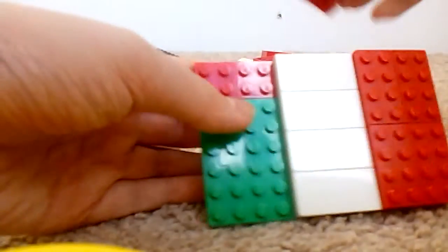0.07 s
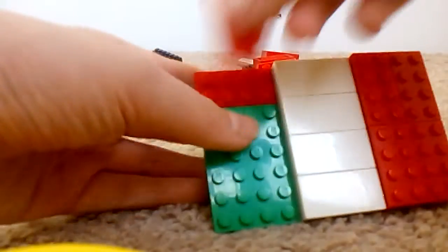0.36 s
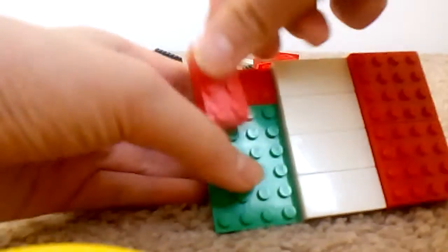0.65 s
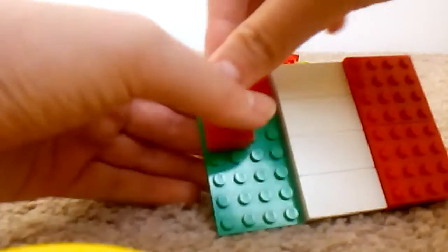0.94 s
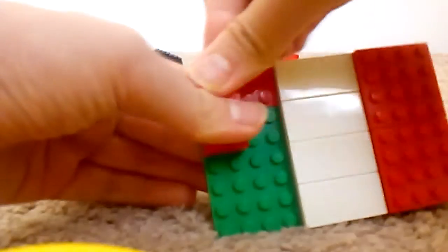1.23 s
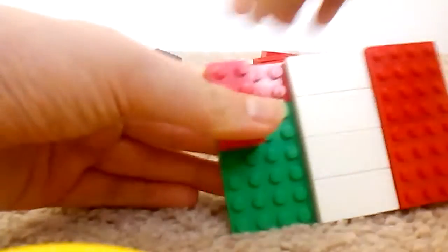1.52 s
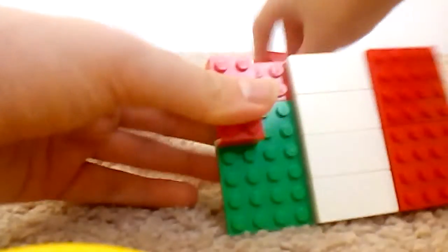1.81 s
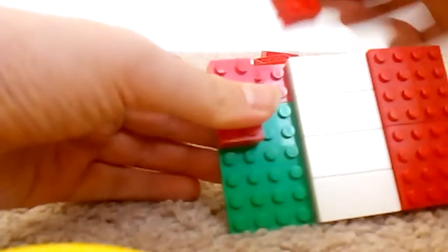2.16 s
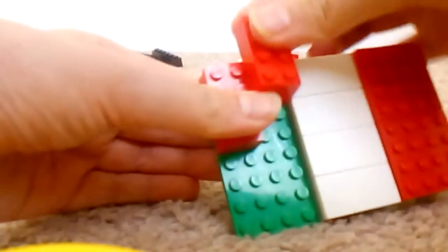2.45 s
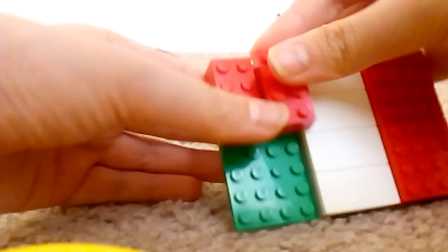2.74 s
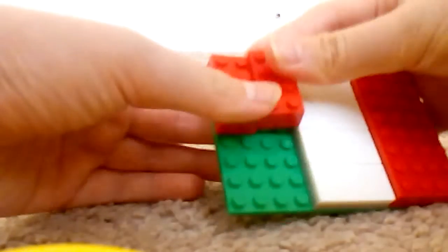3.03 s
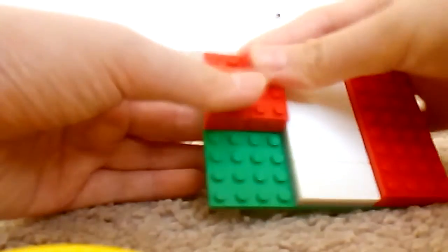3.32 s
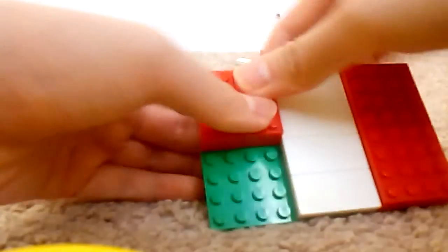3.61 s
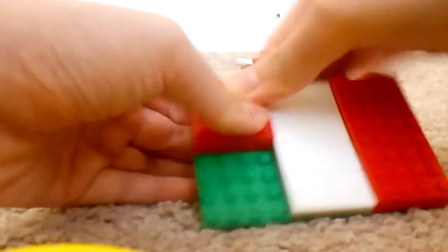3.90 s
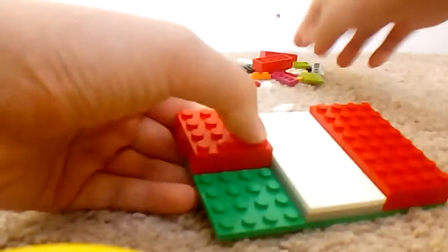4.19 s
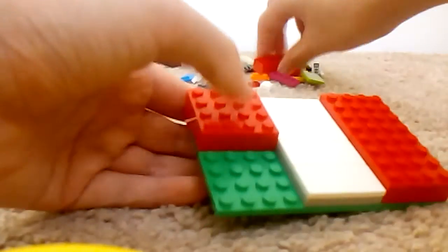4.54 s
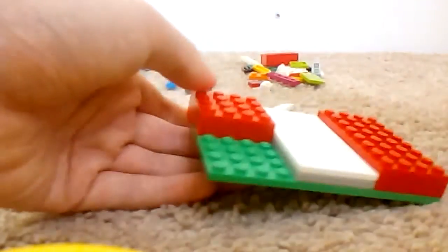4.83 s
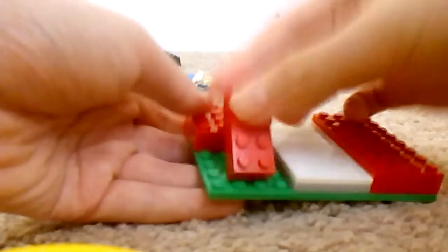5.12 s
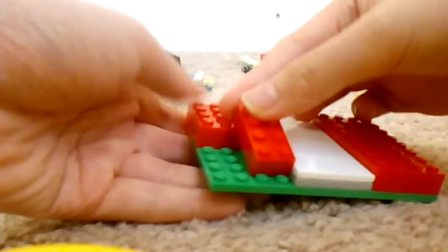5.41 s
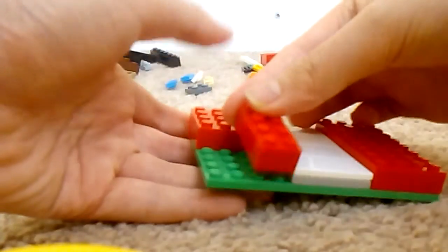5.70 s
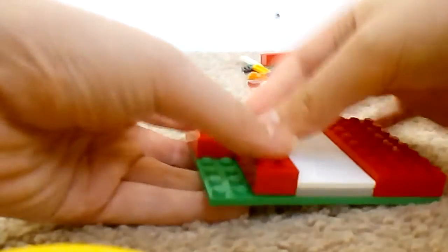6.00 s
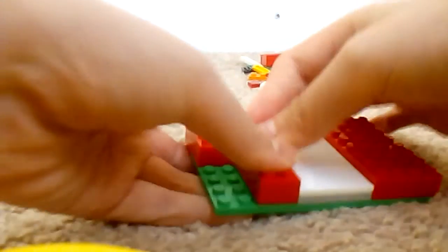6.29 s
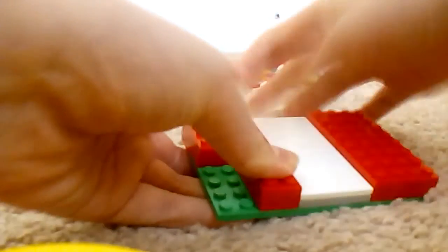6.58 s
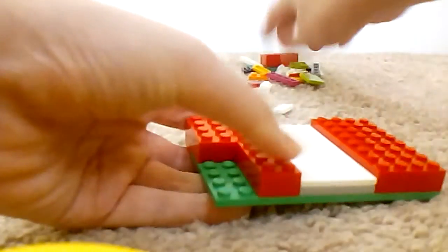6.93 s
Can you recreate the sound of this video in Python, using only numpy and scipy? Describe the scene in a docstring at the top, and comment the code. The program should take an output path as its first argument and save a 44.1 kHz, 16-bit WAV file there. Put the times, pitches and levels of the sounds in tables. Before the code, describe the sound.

A low room rumble and soft hiss run throughout. At about 0.7 seconds a plastic toy brick clicks lightly onto a plate close to the microphone, followed by a quick run of ticks against the studs and a firmer snap at 1.2 seconds. Around 1.9 seconds loose bricks clink briefly in a pile further back. A few small clicks come between 2.6 and 2.8 seconds, then a sharp, bright snap at 3.4 seconds. From 4.6 to 5 seconds a hand picks through the pile again with light, high clinks. Another brick snaps on at 5.4 seconds, with small ticks after it and again near 6.1 seconds. The loudest snap lands at about 6.3 seconds, and a couple of faint ticks follow near the end. Fingers rub faintly on the plastic now and then. The clicks are short and crisp, with a slight small-room echo.

```python
"""A low room rumble and soft hiss come first, then plastic toy bricks click onto a hand-held plate.
Studs tick against brick edges as a brick is lined up; it then slips over them and snaps home.
Each contact makes the plastic ring briefly. Further back, a hand picks loose bricks from a pile.
Fingers rub faintly, thin tones come and go, and the small room adds a few echoes and a short tail."""
import sys
import numpy as np
from scipy import signal
from scipy.fft import rfft, irfft
from scipy.io import wavfile
from scipy.ndimage import uniform_filter1d

SR = 44100
rng = np.random.default_rng(int(sys.argv[2]) if len(sys.argv) > 2 else 0)


def inscribe(sig):
    """Save sig as 16-bit PCM at rate SR to the path in sys.argv[1].

    A 1-D sig is mono; a 2-D sig holds one channel per row.
    Samples are clipped to [-1, 1] before scaling.
    """
    pcm = np.round(np.clip(np.atleast_2d(sig).T, -1, 1) * 32767)
    wavfile.write(sys.argv[1], SR, pcm.astype(np.int16))


N = 306495

# Tone colour of the room and microphone noise: f/Hz, relative level/dB
NOISE_COLOUR = [(20, -24.5), (38, -18), (58, -2), (85, 2), (135, -4.5), (200, -10), (320, -9.5), (500, -16),
                (780, -14), (1200, -18.5), (3000, -22.5), (7200, -23), (8400, -34.5), (9200, -60)]
# Faint thin tones: t/s, length/s, f/Hz, width/Hz, level/dB
THIN_TONES = [(0.712, 1, 742, 130, -69), (1.72, 0.31, 185, 200, -64.5), (4.7, 0.4, 215, 10.5, -66.5)]
# Fingers sliding on plastic: t/s, length/s, rub level/dB, hiss level/dB
FINGER_SLIDES = [(0.798, 0.057, -61, -77), (1.603, .053, -63, -70), (1.894, .078, -61.5, -62),
                 (3.892, 0.12, -61, -64), (4.216, 0.21, -66.5, -78), (5.217, 0.19, -65, -73),
                 (5.909, 0.045, -67, -72.5), (6.45, 0.37, -68, -66)]

# Echoes from the nearest walls and furniture: delay/s, relative level/dB
WALL_ECHOES = [(0.0143, -22.5), (.0176, -28), (0.0217, -25.5), (0.0326, -28), (.0365, -32.5),
               (0.0474, -34.5)]
# How long the room rings: f/Hz, t60/s (t60 is the time to fade by 60 dB)
TAIL_FADE = [(200, .25), (1000, .25), (3000, 0.23), (5200, 0.28), (8000, .3)]
# Tone colour of the room's tail: f/Hz, relative level/dB
TAIL_COLOUR = [(200, -6), (1000, -10), (2000, 1), (3300, 5.5), (4150, -7), (5200, 1), (6000, -2),
               (6900, -0.5), (8500, 2)]

# Modes (natural vibrations) of loose bricks, in two groups: f/Hz, relative level/dB, base t60/s
BRICK_LOW = [(3750, -1.5, 0.0089), (4390, -3, 0.032), (4750, -2, 0.0098), (5200, -2, 0.022),
             (5754, 1, 0.063), (5970, -5, 0.055)]
BRICK_HIGH = [(6430, 5, .025), (6400, -16, .025), (6870, -4, 0.042), (6900, 2, 0.035), (7100, 0, 0.036),
              (7300, 0, 0.015), (7550, -7, 0.023), (8100, -13.5, 0.02)]
# Modes of the built-up plate, in five groups from low to high: f/Hz, relative level/dB, base t60/s
PLATE_THUMP = [(159, -2, .035), (280, 0.5, 0.041), (380, -2, 0.011)]
PLATE_KNOCK = [(660, 0.93, 0.028), (760, 0.52, 0.037), (1001, -1, 0.019)]
PLATE_BODY = [(1239, -5, 0.023), (1522, 2.5, .02), (1934, -4, 0.02), (2244, 3, .02), (2613, 1, 0.023),
              (2970, -3, 0.024)]
PLATE_CRACK = [(3230, -9.5, 0.022), (3460, -4.5, .02), (3620, 1.5, .022), (3850, -3, 0.032),
               (4070, 5.5, 0.015), (4450, 4, .018), (4900, -4, 0.019), (4870, -1.5, 0.029),
               (5250, -1, .018), (5730, 2.5, 0.017)]
PLATE_EDGE = [(6200, 2, 0.014), (6680, -1.5, 0.0086), (6550, 2, 0.022), (6890, 3.5, 0.031),
              (7340, 1, 0.028), (7370, -3.5, 0.042), (8020, -7.5, 0.019)]

# Clinks in the pile, brighter when a corner hits: t/s, relative level/dB, brightness/dB, wall f/Hz
PILE_CLINKS = [(0.236, -66.5, -1, 7000), (0.444, -71, 11.5, 6700), (.544, -70, 4, 6700),
               (1.8989, -41, 4, 6150), (1.916, -37.5, 7.5, 6770), (1.95, -45, 4, 6900),
               (4.619, -53.5, 1, 6800), (4.631, -37, 0.5, 6780), (4.645, -44, 7.5, 6710),
               (4.676, -53, 9, 6660), (4.754, -55, -5, 5750), (4.777, -55.5, 0, 5720),
               (4.8, -55.5, 2, 6530), (4.809, -51, 8, 6500), (4.829, -45, 4, 6370),
               (4.943, -39.5, 2.5, 6840), (5.3142, -59.5, 3, 6800)]
# Studs and edges touching the plate: t/s, level/dB, heft/dB, tilt/(dB per octave), wall f/Hz
# Heft is the whole plate's knock compared with the level; tilt is brightness, higher for hard hits.
# "Wall" is the side of the brick that rings.
STUD_TICKS = [(.8449, -58, -8.5, -1, 7100), (.9135, -44, -16, 4.5, 4330), (.934, -34, -19.5, 2.5, 4180),
              (.9722, -61, -18, 1, 4200), (.9969, -44.5, -9, 1, 3940), (1.0278, -48, -8, 0, 5000),
              (1.052, -43.5, -15, -3, 4050), (1.0792, -40, -20, 1.5, 4120), (1.2012, -35, -16, 6, 4100),
              (1.6255, -63, 6, 7, 7360), (2.5973, -57.5, 8.5, 5, 7060), (2.6075, -45.5, -7, -3, 2280),
              (2.7239, -58, -1, 2, 2270), (2.8046, -42, -20, -2, 3520), (3.127, -62.5, -3, -1, 2230),
              (3.6831, -62.5, 2, -1, 2370), (4.2574, -61, -5, -1.5, 5470), (4.28, -63.5, -2, 11, 5430),
              (4.3161, -62, -2, 6, 4280), (5.5477, -48, -12.5, -1, 4460), (5.6577, -52.5, -16, -6, 3500),
              (6.085, -37.5, -22, -0.5, 4040), (6.101, -57, -10, 4, 4020), (6.1114, -53, -2, 2, 4500),
              (6.1185, -55, -3, -6, 2030), (6.1441, -59, -13.5, -0.5, 3730), (6.8187, -69, 16.5, -8, 2330),
              (6.8483, -57.5, -4, 3, 4840)]
# Bricks slipping over the studs, then seating (landing in place):
# t/s, slip level/dB, slip heft/dB, slip wall f/Hz, travel/s,
# seat level/dB, seat heft/dB, seat tilt/(dB per octave), seat wall f/Hz, seat wall level/dB
BRICK_SNAPS = [(0.6963, -44.5, -15, 6820, 0.003, -45.5, 1, -3.5, 7100, -55),
               (1.2309, -29, -30, 4100, .0029, -35.5, 4.5, -2, 3880, -31),
               (2.7339, -39.5, -8, 4150, .002, -43, -3, -7.5, 3960, -46),
               (3.442, -20, -15, 5150, 0.002, -36, -9.5, 13, 3680, -19.5),
               (5.407, -34, -23, 4270, .0105, -30.5, -16.5, 4, 2600, -39),
               (6.2619, -20.5, -23.5, 6606, .003, -18, -19, -2, 3040, -26.5)]


def amp(db):
    """Turns decibels into a gain."""
    return 10 ** (np.asarray(db) / 20)


def unit(x):
    """Scales a signal to an average (rms) size of 1."""
    return x / np.sqrt(np.mean(x ** 2) + 1e-20)


def unit_hit(x):
    """Scales a short sound to the energy of 10 ms at rms 1."""
    return x * np.sqrt(SR / 100 / (np.sum(x ** 2) + 1e-20))


def curve_at(points, hz):
    """Looks up values between a table's frequencies, on a log scale."""
    f, value = np.transpose(points)
    return np.interp(np.log(hz + 1), np.log(f + 1), value)


def add(mix, s, sound):
    """Mixes a sound in at s seconds."""
    part = mix[round(s * SR):][:len(sound)]
    part += sound[:len(part)]


def without_bass(x, edge_hz, order):
    """Turns down everything below edge_hz."""
    return signal.sosfilt(signal.butter(order, edge_hz, "high", fs=SR, output="sos"), x)


def ring(hz, t60, rise_s=.00012):
    """One vibration with a slightly softened start, which then dies away."""
    t = np.arange(4096) / SR
    return np.sin(2 * np.pi * hz * t) * np.exp(-np.log(1000) * t / t60) * (1 - np.exp(-t / rise_s))


def strike(modes, t60_scale=1, spread_db=5.0, detune=0.0056):
    """Rings a group of modes; the spot hit sets each one's sign and share, and the grip detunes it."""
    hz, db, t60 = np.transpose(modes)
    side, share, grip = rng.standard_normal((3, len(hz)))
    rings = ring((hz * (1 + detune * grip))[:, None], t60[:, None] * t60_scale)
    return unit_hit((np.sign(side) * amp(db + spread_db * share)) @ rings)


def swell(length, centre_hz, width_hz, grain_db=3):
    """A band of grainy noise swells and fades: a rub when wide, a thin tone when narrow."""
    hz = np.fft.rfftfreq(SR, 1 / SR)
    hiss, grain = rng.standard_normal((2, SR))
    rough = hiss * amp(grain_db * unit(uniform_filter1d(grain, size=130)))
    band = 1 / (1 + (2 * (hz - centre_hz) / width_hz) ** 4)
    rub = irfft(rfft(rough) * band, SR)[:round(length * SR)]
    return unit(rub * signal.windows.tukey(len(rub), .7))


def background(level_db=-61, waver_db=2.0, rumble_hz=350):
    """Room and microphone noise: a steady hiss over a low rumble that wavers."""
    hz = np.fft.rfftfreq(N, 1 / SR)
    noise = rfft(rng.standard_normal(N)) * amp(curve_at(NOISE_COLOUR, hz))
    low_share = 1 / (1 + (hz / rumble_hz) ** 4)
    waver = unit(irfft(rfft(rng.standard_normal(N)) * np.exp(-hz / 6), N))
    rumble = irfft(noise * low_share, N) * amp(waver_db * waver)
    hiss = irfft(noise * (1 - low_share), N)
    return amp(level_db) * unit(rumble + hiss)


def tones():
    """Faint thin tones come and go in the noise."""
    out = np.zeros(N)
    for s, length, hz, width_hz, db in THIN_TONES:
        add(out, s, amp(db) * swell(length, hz, width_hz))
    return out


def room(x, echo_db, tail_db, onset_s):
    """The room answers with a few clear echoes and a blurred tail; each pitch fades at its own rate."""
    hz, t, bands = signal.stft(rng.standard_normal(SR // 2), SR, nperseg=256)
    colour = amp(curve_at(TAIL_COLOUR, hz))[:, None]
    fade = np.exp(-np.log(1000) * t / curve_at(TAIL_FADE, hz)[:, None])
    tail = signal.istft(bands * colour * fade, SR, nperseg=256)[1]
    tail *= 1 - np.exp(-(np.arange(len(tail)) / SR / onset_s) ** 2)  # the tail builds up
    response = amp(tail_db) * tail / np.linalg.norm(tail)
    for delay, db in WALL_ECHOES:
        add(response, delay, amp([db + echo_db]))
    return signal.oaconvolve(x, response)[:N]


def fingers():
    """Each slide of a finger gives a dull rub with a hiss on top."""
    out = np.zeros(N)
    for s, length, rub_db, hiss_db in FINGER_SLIDES:
        add(out, s, amp(rub_db) * swell(length, centre_hz=840, width_hz=2640))
        add(out, s, amp(hiss_db) * swell(length, centre_hz=6240, width_hz=3340))
    return out


def creaks(per_s=5, level_db=-74, low_db=-2, tries=120):
    """The held plate gives tiny ticks at random as the grip shifts."""
    out = np.zeros(N)
    for when, chance in rng.random((tries, 2)):
        if chance < per_s * N / SR / tries:
            high = strike(PLATE_CRACK) + strike(PLATE_EDGE)
            low = strike(PLATE_BODY) + strike(PLATE_KNOCK) + strike(PLATE_THUMP)
            add(out, when * N / SR, amp(level_db) * (high + amp(low_db) * low))
    return out


def pile(level_db=-1.5, chatter_s=0.038, chatter_db=-8, settle_db_per_s=-230):
    """Loose bricks clink and chatter against their neighbours; they are too small to give off bass."""
    out = np.zeros(N)
    for s, clink_db, bright_db, wall_hz in PILE_CLINKS:
        add(out, s, amp(clink_db + bright_db) * unit_hit(ring(wall_hz, t60=0.043)))
        brightness = amp(0.47 * bright_db)  # lifts the high modes and lowers the low ones
        delays = chatter_s * rng.random(size=6)
        chatter = [(delay, chatter_db + settle_db_per_s * delay) for delay in delays]
        for delay, db in [(0.00017, 0.003)] + chatter:  # the first hit, then the chatter
            clink = strike(BRICK_LOW) / brightness + strike(BRICK_HIGH) * brightness
            add(out, s + delay, amp(clink_db + db) * clink)
    return amp(level_db) * without_bass(out, edge_hz=1800, order=1)


def contact(level_db, heft_db, tilt, wall_hz, wall_db, wall_t60=.018, t60_scale=0.8):
    """One hit rings the plate and a brick wall; heft adds low knock, tilt trades body for bright edge."""
    groups = [(PLATE_THUMP, level_db + heft_db - 8),
              (PLATE_KNOCK, level_db + heft_db),
              (PLATE_BODY, level_db - 6.5 - 1.6 * tilt),  # tilt times octaves from the crack group
              (PLATE_CRACK, level_db),
              (PLATE_EDGE, level_db - 5.5 + 0.81 * tilt)]
    plate = sum(amp(db) * strike(modes, t60_scale) for modes, db in groups)
    return plate + amp(wall_db) * unit_hit(ring(wall_hz, wall_t60))


def ticks(bounce_s=.0025, bounce_db=-10, unevenness=.3):
    """Light touches while a brick is lined up, each with one quick bounce."""
    out = np.zeros(N)
    for s, tick_db, heft_db, tilt, wall_hz in STUD_TICKS:
        gap_s = bounce_s * np.exp(unevenness * rng.standard_normal())
        for delay, db in ((0, tick_db), (gap_s, tick_db + bounce_db)):
            tick = contact(db, heft_db, tilt, wall_hz, wall_db=db + 0.5, wall_t60=0.013, t60_scale=.75)
            add(out, s + delay, tick)
    return out


def snaps(lead_in_s=.0028, bounces=5, bounce_s=.0047, unevenness=.25, wander=.09):
    """A brick slips over the studs, seats and rattles to rest; a faint lead-in tick softens the start."""
    out = np.zeros(N)
    for s, slip_db, slip_heft_db, slip_hz, travel_s, *seating in BRICK_SNAPS:
        seat_db, seat_heft_db, seat_tilt, seat_hz, seat_wall_db = seating
        lead_in_db = slip_db - 21
        lead_in = contact(lead_in_db, heft_db=-9.5, tilt=0, wall_hz=seat_hz, wall_db=lead_in_db)
        slip = contact(slip_db, slip_heft_db, tilt=2.9, wall_hz=slip_hz, wall_db=slip_db + 6.5)
        seat = contact(seat_db, seat_heft_db, seat_tilt, seat_hz, seat_wall_db)
        add(out, s - lead_in_s, lead_in)
        add(out, s, slip)
        add(out, s + travel_s, seat)
        for k, (late, spot) in enumerate(rng.standard_normal((bounces, 2))):
            db = seat_db - 10.5 - 5 * k  # each bounce is weaker
            wall_hz = seat_hz * np.exp(wander * spot)  # and lands on a slightly different spot
            bounce = contact(db, heft_db=-12.5, tilt=-1, wall_hz=wall_hz, wall_db=db + 2)
            add(out, s + travel_s + (k + 1 + unevenness * late) * bounce_s, bounce)
    return out


def scene():
    """The plate is close and clear; the pile lies further off, so more of the room is heard with it."""
    light, hard = ticks(), snaps()
    near = light + hard + creaks()
    near += room(light + amp(0.9) * hard, echo_db=-0.5, tail_db=-19.5, onset_s=0.023)
    loose = pile()
    far = loose + room(loose, echo_db=4, tail_db=-10.0, onset_s=0.0084)
    return (without_bass(near, edge_hz=55, order=2) + far + fingers() + tones() + background())[None]


def record(dry, ceiling=.85, cutoff_hz=8900):
    """The hardest snaps gently overload the microphone; then the highest treble is cut away."""
    softened = dry / (1 + (dry / ceiling) ** 6) ** (1 / 6)
    low_pass = signal.firwin(141, cutoff_hz, window=("kaiser", 8), fs=SR)
    return signal.oaconvolve(softened, low_pass[None], "same")


dry = scene()
out = record(dry)
inscribe(out)
```